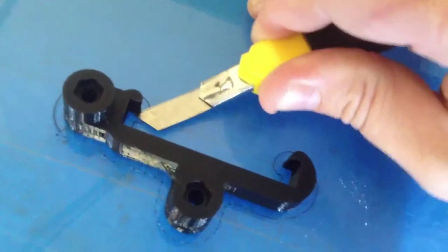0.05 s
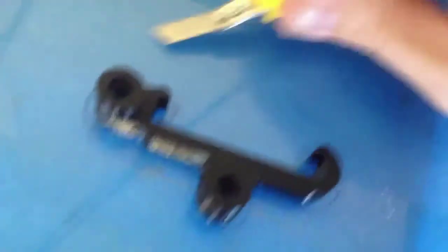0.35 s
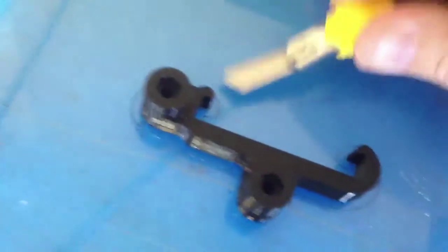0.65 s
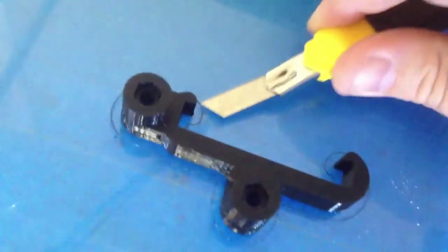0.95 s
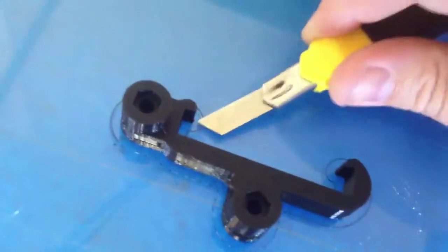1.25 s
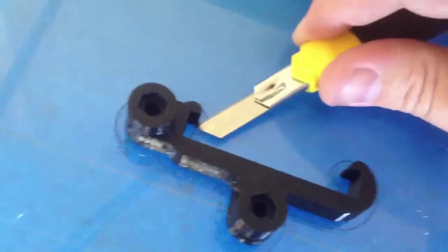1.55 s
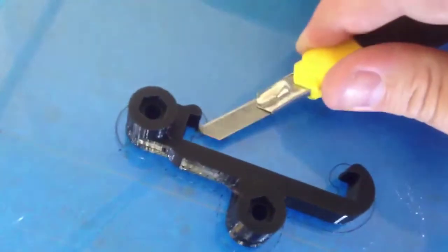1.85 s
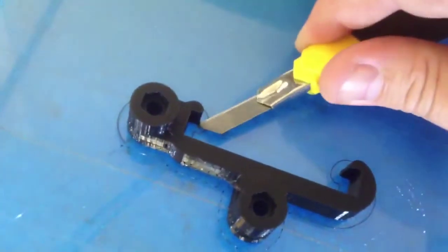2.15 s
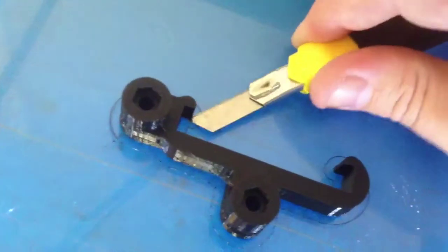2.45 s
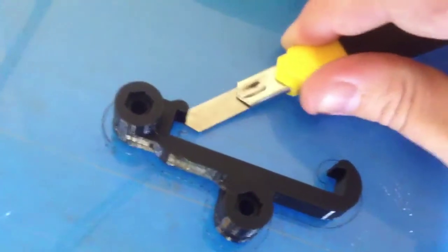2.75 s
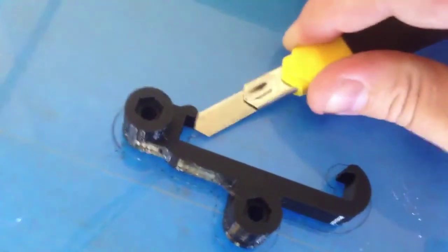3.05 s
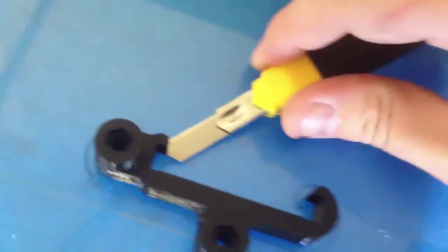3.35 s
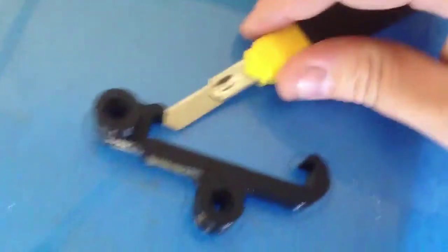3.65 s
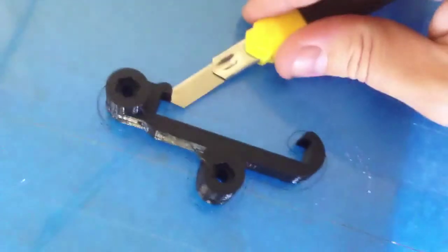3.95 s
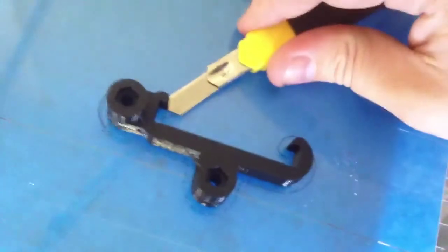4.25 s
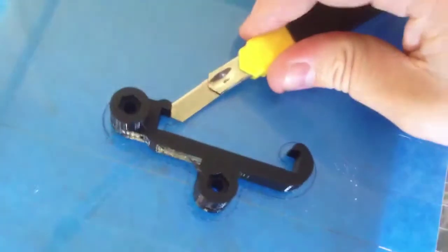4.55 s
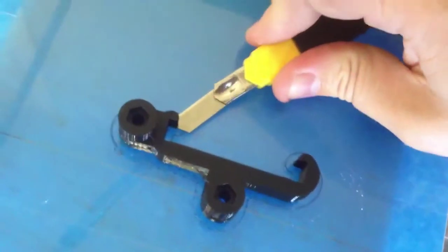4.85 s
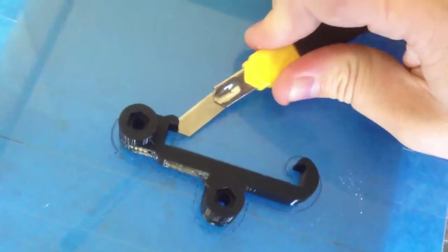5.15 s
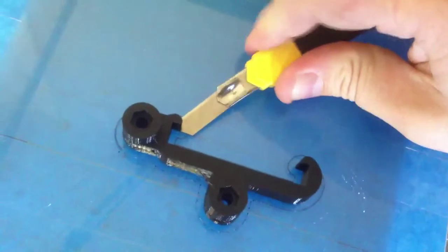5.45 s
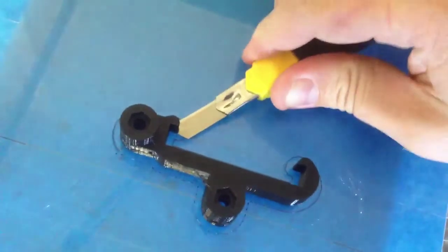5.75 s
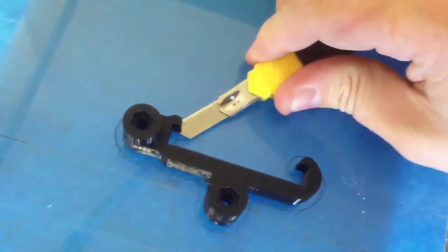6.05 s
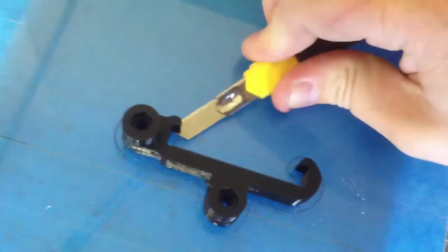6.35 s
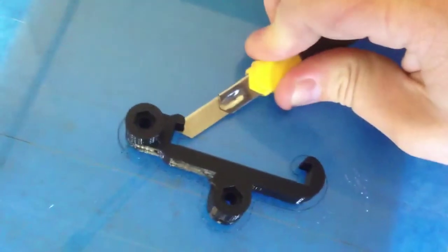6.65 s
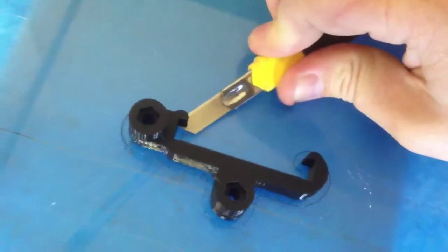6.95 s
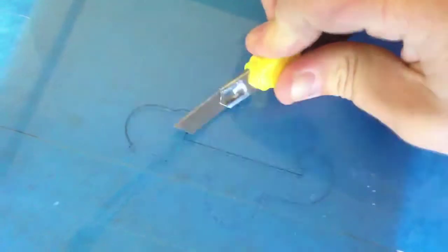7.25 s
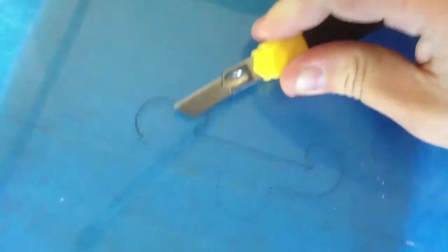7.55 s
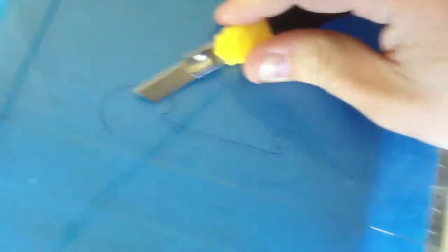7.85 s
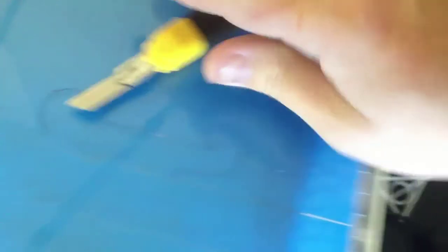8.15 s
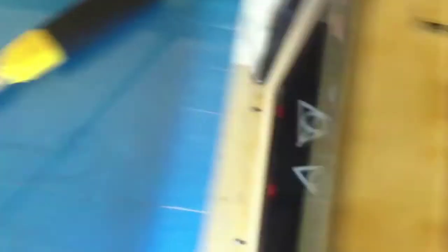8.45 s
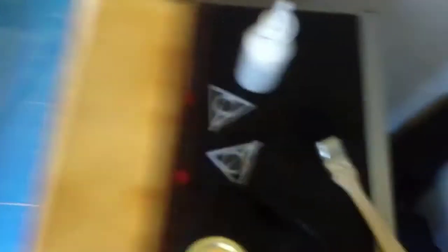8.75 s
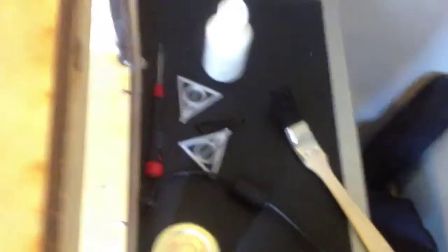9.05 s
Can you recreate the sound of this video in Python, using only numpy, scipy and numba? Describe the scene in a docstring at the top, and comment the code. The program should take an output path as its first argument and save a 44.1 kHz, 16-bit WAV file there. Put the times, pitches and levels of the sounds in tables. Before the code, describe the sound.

A 3D printer's fans hum steadily throughout, close by in a small room, with a faint high whine. Right at the start a craft knife blade slips on the glass bed with a quick cluster of sharp, ringing ticks, followed by faint short scrapes until about 1.3 seconds. More ticks and knocks come around 2.6 to 2.9 seconds, and a bright metallic click at 4.2. From 4.9 seconds the stuck plastic part gives small brittle cracks, which thicken into crackling near 6.8. At 7.1 it snaps free sharply. The part knocks on the frame at 7.4, then bounces with loud clacks and a hollow knock from 7.7, loudest near 7.9, tumbling to rest by 8.2. The hum dips briefly after these blows. The knife rustles softly in the hand until 8.5, and the hum and thin whine become plainer through the end, just after 9 seconds.

```python
"""A small room, close to the glass bed of a 3D printer, where a craft knife picks at a stuck plastic part.
The blade scrapes by stick-slip friction and strikes the glass; the bond cracks in brittle steps and
snaps; the part flies off, knocks on the frame and clatters to rest. Each impact is a burst of noise
plus the damped modes of the bodies it excites. The printer's fans hum throughout beside a thin whine,
and an automatic gain control ducks the whole sound after the loudest blows."""
import sys
import numpy as np
from scipy import signal
from scipy.fft import rfft, irfft, next_fast_len
from scipy.io import wavfile
from scipy.ndimage import uniform_filter1d
from numba import njit

SR = 44100
rng = np.random.default_rng(int(sys.argv[2]) if len(sys.argv) > 2 else 0)


def int16_out(signal):
    """Quantize to a 16-bit WAV file."""
    q = np.round(np.clip(np.atleast_2d(signal).T, -1, 1) * 32767)
    wavfile.write(sys.argv[1], SR, q.astype(np.int16))


N = 406148
TIME = np.arange(N) / SR
AGE = np.arange(SR // 2) / SR  # seconds since an impact
BLOW_SPAN_S = .003

# Reverberation of the room. Each row: frequency in Hz, t60 (time to fall 60 dB) in seconds.
ROOM_T60 = [(150, 3.45), (500, 0.82), (1500, 0.3846), (4000, 0.55), (8000, 0.47), (14000, 0.19)]
# Spectra of the room, the rushing air and the contact noises.
# Each row: frequency in Hz, relative level in dB.
ROOM_SPECTRUM = [(100, -5), (600, -1), (1500, 2), (5000, 0.5), (8000, -0.5), (10500, -2.5), (15000, -1.5)]
AIR_SPECTRUM = [(30, -15), (80, -29), (125, -9), (180, -3), (230, -10), (300, -1.5), (440, -0.5), (570, -6),
                (800, -6.5), (1600, -7), (3300, -15), (6300, -22.3), (10000, -42.5), (14000, -31)]
SCRAPE_SPECTRUM = [(200, -36), (1500, -6), (3500, -10), (5300, -4), (7500, -5.5), (10200, -16.5),
                   (13000, -14), (15500, -21.5)]
SPLIT_SPECTRUM = [(200, -27), (1500, -16.5), (3500, -16.5), (4500, -5.5), (6000, -6), (8000, -5.5),
                  (10500, -11), (13500, -17.5), (15500, -6.5)]
CLACK_SPECTRUM = [(60, -42), (150, -22), (350, -14), (800, -3.5), (1600, 2), (3000, -4.5), (4700, -7),
                  (7000, -11.5), (8500, -17.5), (10200, -30), (13000, -31), (15500, -40)]
TICK_SPECTRUM = [(100, -32.5), (600, -16.5), (2000, -3), (3100, -3.5), (4500, 2), (7500, -2.5),
                 (9000, -5.5), (10200, -15.5), (12500, -10), (15500, -7.5)]

# Harmonics of the slow fan. Each row: multiple of the shaft rate, base level in dB.
FAN_HARMONICS = [(3, -66), (4, -59), (5, -58.5), (6, -52.8), (7, -54.3), (8, -64.5), (9, -67.5),
                 (10, -69.5), (11, -68.5), (12, -64), (16, -67.5), (17, -68), (18, -63.5), (19, -59.5),
                 (21, -65), (26, -69), (34, -69.5), (38, -69), (41, -67), (46, -68.5)]
# Blade tones of the small fans. Each row: frequency in Hz, base level in dB, fractional pitch wander.
FAN_TONES = [(302.9, -48.8, .003), (396, -61, .006)]
# Resonances of the housing. Each row: frequency in Hz, bandwidth in Hz, base level in dB.
HOUSING_RESONANCES = [(1176, 110, -59.5), (1390, 120, -64.5), (1720, 120, -62), (2644, 160, -64.5),
                      (4390, 350, -68.5)]
# Nearness of the fans. Each row: time in seconds, gain on their base levels in dB.
FAN_NEARNESS = [(0, .3), (0.5, -1.8), (3, -.7), (7, -.6), (7.7, -.3), (8.4, 4.8), (9.2, 2.2)]
# Whine, plainer once the microphone turns from the bed. Each row: time in seconds, level in dB.
WHINE_LEVELS = [(0, -73), (4, -73), (8.4, -70), (8.7, -60.5), (9.2, -59.5)]

# Normal modes of each body. Each row: frequency in Hz, relative level in dB, t60 in seconds.
BLADE_MODES = [(2950, -11, 0.028), (3800, -9, .014), (4344, -8, 0.055), (4650, -6, 0.016), (5860, 3, .02),
               (6140, -3, .025), (6620, -4, .11), (6760, -1, .11), (7224, 5.5, 0.011), (7860, -2.5, .04),
               (13000, -11.5, .02)]
BED_MODES = [(416, -3, .05), (650, -1, .045), (1002, -4.5, 0.023), (1135, 6.5, 0.052), (1454, -3, .045),
             (1560, -7.5, .04), (1857, -1, 0.024), (2200, 0.5, 0.026)]
PART_MODES = [(2830, -11, 0.03), (4120, -1.5, 0.018), (4980, -8.5, 0.017), (7500, 1.5, 0.0085),
              (8510, 0.5, 0.0097), (12100, -15, 0.016), (12900, -2.5, 0.013)]
PART_FLEX_MODES = [(400, -9, .07), (1010, -2, .022), (1950, 0, .011), (2890, -4, .012), (3257, -6, .014)]
FRAME_MODES = [(768, -4, 0.075), (1306, 4, 0.05), (1296, -8, 0.048), (1480, -13, 0.028),
               (1820, -4.5, 0.061), (2460, -7, 0.03), (3260, -9.5, 0.023)]
PANEL_MODES = [(144.7, -17.5, 0.78), (303, -9, 0.076), (333, -6.5, 0.15), (403.2, 2, 0.19), (479, -4, 0.22),
               (616, -8, 0.059), (671, -8, 0.14), (790, -21, .1)]

# The knife rustles in the hand as it is lifted away. Each row: start in seconds, level in dB.
RUSTLES = [(8.179, -21.5), (8.241, -26), (8.321, -26), (8.372, -27.5), (8.443, -35), (8.485, -31)]
# Strokes of the tip along the glass. Each row: start in seconds, length in seconds, strength in dB.
STROKES = [(0.3674, .01, -36), (0.6882, .03, -25.5), (0.7854, .01, -34), (1.114, .01, -31.5),
           (1.1434, .095, -28.5), (1.285, .01, -37), (2.2009, .01, -46), (2.562, .026, -21.5)]
# Sharp cracks of the bond. Each row: start in seconds, strength in dB.
CRACKS = [(4.8937, -36), (4.9966, -27), (5.0439, -23), (5.1629, -19.5), (5.9174, -40), (6.1885, -33.5),
          (6.6659, -23.5), (6.772, -24.5), (6.8142, -25), (6.8535, -16.5), (6.8628, -15), (6.922, -25.5),
          (6.9368, -24), (7.063, -28), (7.0782, -25)]
# Spells of peeling. Each row: start in seconds, end in seconds, strength in dB.
PEELS = [(4.985, 5.12, -38), (6.755, 6.89, -30.5), (7.08, 7.108, -32)]
# How freely the part rings as it comes loose. Each row: time in seconds, gain of its ring in dB.
LOOSENESS = [(5, -31), (6.7, -13), (7.1, -7.5)]
# Bounces of the part. Each row: start in seconds, clack level in dB, tilt in dB per octave, surface.
BOUNCES = [(7.3775, -7.2, -1, "frame"), (7.4074, -11, -2.5, "frame"), (7.488, -25, -3.5, "frame"),
           (7.5174, -30, 12, "edge"), (7.726, -7, -7, "bench"), (7.7322, -13, -13.5, "panel"),
           (7.7651, -5.5, -2, "bench"), (7.844, -6, -5, "bench"), (7.9206, 2, 3.5, "edge"),
           (7.939, -13, 14, "edge")]
# What the part hits. Each entry: frame ring, hollow panel boom and room send, in dB relative to the clack.
SURFACES = {"frame": (-1.5, -16, -9.5), "panel": (-12, 14, -24), "bench": (-15, -18, .3),
            "edge": (-13, -13, -10)}
# The blade slips and strikes the glass. Each row: start in seconds, tick level in dB,
# knock strength in dB, knock pitch in Hz, blade ring level in dB, ring pitch in Hz.
SLIPS = [(0.135, -15.5, -18, 2100, -22, 3900), (0.1435, -10.5, -14.5, 1250, -9.5, 5950),
         (0.1515, -8, -16.5, 1400, -27.5, 6000), (0.9415, -36, -36, 1550, -36, 5800),
         (2.5874, -22.5, -36, 750, -31, 4200), (2.6963, -19, -15.5, 1280, -18, 4150),
         (2.9338, -30, -36, 1100, -24.5, 4280), (4.159, -24, -38, 1400, -33.5, 8070),
         (4.162, -11, -33, 3000, -15, 6850), (4.6726, -46, -35.5, 1430, -38.5, 4600),
         (5.273, -35, -36.5, 1300, -44, 6800), (6.4225, -48, -40.5, 1050, -50.5, 6030)]
# The bed's dense modes. Each row: multiple of the knock pitch, relative level in dB.
THUMP_SHAPE = [(.1, -34.5), (.4, -16), (.8, 0), (1.1, 2), (1.5, -2.5), (2.2, -17), (6, -39)]


def undb(db):
    """Amplitude ratio for a level in decibels."""
    return 10 ** (np.asarray(db) / 20)


def level(x, db):
    """Scale a steady sound to an rms level."""
    return x * undb(db) / np.sqrt(np.mean(x ** 2))


def blow(x, db):
    """Scale a transient by its energy, as if all of it fell within BLOW_SPAN_S."""
    return x * undb(db) / np.sqrt(np.sum(x ** 2) / (BLOW_SPAN_S * SR))


def fade(t60):
    """Exponential decay by 60 dB in t60 seconds."""
    return np.exp(-np.log(1000) * AGE / t60)


def on_log(hz, points):
    """Interpolate (Hz, value) points on a logarithmic frequency axis."""
    knots_hz, values = np.transpose(points)
    return np.interp(np.log(np.maximum(hz, 1)), np.log(knots_hz), values)


def colour(x, spectrum, tilt_db=0):
    """Minimum-phase filter with the given spectrum, tilted by tilt_db per octave above 500 Hz."""
    size = 2 * next_fast_len(len(x) // 2 + 1)
    hz = np.fft.rfftfreq(size, 1 / SR)
    octave = np.log2(np.maximum(hz, 500) / 1000)
    cepstrum = irfft(np.log(undb(on_log(hz, spectrum) + tilt_db * octave)))
    cepstrum[1:size // 2] *= 2  # folding the cepstrum makes the filter causal
    cepstrum[size // 2 + 1:] = 0
    return irfft(rfft(x, size) * np.exp(rfft(cepstrum)))[:len(x)]


def drift(rate_hz):
    """Slow random modulation of unit rms, gliding to a new value rate_hz times a second."""
    step = int(SR / rate_hz)
    held = np.repeat(rng.standard_normal(N // step + 1), step)
    return level(uniform_filter1d(held, step)[:N], 0)


def add(track, s, x):
    """Superpose x on the track from s seconds."""
    start = int(s * SR)
    track[start:start + len(x)] += x[:N - start]


def contact(spectrum, db, t60, tilt_db=0, rise_s=.0005):
    """Modal overlap: the dense, heavily damped vibrations of a contact merge into a burst of noise."""
    envelope = fade(t60) * (1 - np.exp(-AGE / rise_s))
    return blow(colour(rng.standard_normal(len(AGE)) * envelope, spectrum, tilt_db), db)


def radiated(spectrum, db, tilt_db=0):
    """Spatial averaging: summed over all directions, a contact sends a smooth spectrum into the room."""
    return blow(colour(signal.unit_impulse(len(AGE)), spectrum, tilt_db), db)


def ring(modes, db, scatter_db=2.0, detune=.0017, rise_cycles=.98):
    """Free vibration: damped modes whose strength, sign and pitch vary with where the blow lands."""
    out = 0
    for (hz, mode_db, t60), (size, side, shift) in zip(modes, rng.standard_normal((len(modes), 3))):
        cycles = hz * (1 + detune * shift) * AGE
        mode = np.sin(2 * np.pi * cycles) * (1 - np.exp(-cycles / rise_cycles)) * fade(t60)
        out = out + np.sign(side) * blow(mode, mode_db + scatter_db * size)
    return blow(out, db)


def favour(modes, pitch_hz, slope_db):
    """Selective excitation: the contact point favours modes near a pitch, by slope_db per octave."""
    return [(hz, db - slope_db * abs(np.log2(hz / pitch_hz)), t60) for hz, db, t60 in modes]


def room(x, build_s=.002):
    """Diffuse reverberation: half a second of dense reflections, dying sooner in the treble."""
    noise = rfft(rng.standard_normal(len(AGE)))
    hz = np.fft.rfftfreq(len(AGE), 1 / SR)
    centres, t60s = np.transpose(ROOM_T60)
    tail = 0
    for weights, t60 in zip(np.eye(len(centres)), t60s):
        band = on_log(hz, list(zip(centres, weights)))
        tail = tail + irfft(noise * band, len(AGE)) * fade(t60)
    tail *= 1 - np.exp(-(AGE / build_s) ** 2)
    response = colour(tail / np.sqrt(np.sum(tail ** 2)), ROOM_SPECTRUM)
    return signal.fftconvolve(x, response)[:N]


def fans(shaft_hz=65.25, shaft_wander=.0016, air_db=-50.6, flutter_db=1.4, tone_flutter_db=1.7):
    """Rotation gives wavering harmonics and blade tones; turbulence hisses and excites the housing."""
    shaft_angle = 2 * np.pi * np.cumsum(shaft_hz * (1 + shaft_wander * drift(4))) / SR
    out = level(colour(rng.standard_normal(N), AIR_SPECTRUM), air_db)
    for order, db in FAN_HARMONICS:
        harmonic = np.sin(order * shaft_angle + 2 * np.pi * rng.random())
        out += level(harmonic * undb(flutter_db * drift(14)), db)
    for hz, db, wander in FAN_TONES:
        phase = 2 * np.pi * np.cumsum(hz * (1 + wander * drift(15))) / SR
        out += level(np.sin(phase) * undb(tone_flutter_db * drift(14)), db)
    for hz, width_hz, db in HOUSING_RESONANCES:
        resonator = signal.iirpeak(hz, hz / width_hz, fs=SR)
        out += level(signal.lfilter(*resonator, rng.standard_normal(N)), db)
    return out * undb(np.interp(TIME, *np.transpose(FAN_NEARNESS)))


def whine(pitch_hz=4660, width_hz=110):
    """The printer's electrical whine: narrow-band noise is heard as an unsteady pitch."""
    band = signal.iirpeak(pitch_hz, pitch_hz / width_hz, fs=SR)
    whistle = signal.lfilter(*band, signal.lfilter(*band, rng.standard_normal(N)))
    return level(whistle, 0) * undb(np.interp(TIME, *np.transpose(WHINE_LEVELS)))


def catches(gap_s=.018, jitter_s=.002, scatter_db=1.5, ease_db=-4.5):
    """Stick-slip motion: a stroke breaks into uneven catches (s, dB) that weaken as pressure eases."""
    for start, length, db in STROKES:
        ages = np.arange(0, length, gap_s)
        for age, (late, size) in zip(ages, rng.standard_normal((len(ages), 2))):
            s = start + age + jitter_s * late * (age > 0)
            yield s, db + ease_db * age / length + scatter_db * size


def scraping(scrape_db=-11, squeak_db=-15, squeak_hz=5500, room_db=-8):
    """Friction: the knife rustles in the hand, and each catch of its tip scrapes and faintly squeaks."""
    direct = np.zeros(N)
    for s, db in RUSTLES:
        add(direct, s, contact(SCRAPE_SPECTRUM, db, t60=.065, tilt_db=-2.0))
    for s, db in catches():
        scrape = contact(SCRAPE_SPECTRUM, db + scrape_db, t60=.048)
        squeak = ring([(squeak_hz, 0, .04)], db + squeak_db, detune=.058)
        add(direct, s, scrape + squeak)
    return direct, direct * undb(room_db)


def fine_cracks(gap_s=.015, scatter_db=2.5):
    """Stepwise fracture: each spell of peeling scatters small cracks (s, dB) at uneven gaps."""
    for start, end, db in PEELS:
        for s in np.arange(start, end - gap_s / 2, gap_s):
            yield s + gap_s * rng.random(), db + scatter_db * rng.standard_normal()


def bond(split_db=-10, untilted_db=-18, brightening=.16, room_db=-9, ring_room_db=-13):
    """Brittle fracture: as the part loosens, each crack is brighter and rings it more strongly."""
    direct, to_room = np.zeros(N), np.zeros(N)
    for s, db in [*CRACKS, *fine_cracks()]:
        loose_db = np.interp(s, *np.transpose(LOOSENESS))
        tilt_db = brightening * (loose_db - untilted_db)
        split = contact(SPLIT_SPECTRUM, db + split_db, t60=.0207, tilt_db=tilt_db, rise_s=.0003)
        ping = ring(PART_MODES, db + loose_db, scatter_db=5, detune=.017)
        add(direct, s, split + ping)
        add(to_room, s, split * undb(room_db) + ping * undb(ring_room_db))
    return direct, to_room


def tumbles(start_s=7.9593, first_db=-3.5, tilt_db=1.4, turn_s=.0345, slowing=1.39, loss_db=-4.2):
    """Dissipation: the part tumbles to rest in four bounces, each turn slower and weaker."""
    s = start_s
    for turn in range(4):
        yield s, first_db + loss_db * turn, tilt_db, "bench"
        s += turn_s * slowing ** turn


def falling_part(clack_t60=.036, ring_room_db=-1):
    """Impact excitation: each bounce clacks and drives the modes of the frame and a hollow panel."""
    direct, to_room = np.zeros(N), np.zeros(N)
    for s, clack_db, tilt_db, surface in [*BOUNCES, *tumbles()]:
        frame_db, panel_db, room_db = SURFACES[surface]
        body = ring(FRAME_MODES, clack_db + frame_db) + ring(PANEL_MODES, clack_db + panel_db)
        clack = contact(CLACK_SPECTRUM, clack_db, clack_t60, tilt_db, rise_s=.00067)
        add(direct, s, clack + body)
        wash = radiated(CLACK_SPECTRUM, clack_db, tilt_db)
        add(to_room, s, (wash + body * undb(ring_room_db)) * undb(room_db))
    return direct, to_room


def snap(start_s=7.1085, crack_db=-5.5, tilt_db=5.5, room_db=-5.5, flex_room_db=-8, blade_room_db=-17):
    """Release of elastic energy: the last of the bond cracks, the part flexes, the blade springs back."""
    direct, to_room = np.zeros(N), np.zeros(N)
    flex = ring(PART_FLEX_MODES, db=-13.5)
    ping = ring(favour(BLADE_MODES, pitch_hz=7470, slope_db=33.5), db=-9)
    crack = contact(TICK_SPECTRUM, crack_db, t60=.015, tilt_db=tilt_db, rise_s=.0015)
    add(direct, start_s, crack + flex + ping)
    wash = radiated(TICK_SPECTRUM, crack_db, tilt_db) * undb(room_db)
    add(to_room, start_s, wash + flex * undb(flex_room_db) + ping * undb(blade_room_db))
    return direct, to_room


def knife(thump_db=-2, bed_db=-2, even_tilt_db=-1.0, glance_tilt=.21,
          room_db=-12.6, ring_room_db=-5, knock_room_db=1):
    """A collision excites both bodies: the slipping blade ticks and rings, and the glass bed knocks."""
    direct, to_room = np.zeros(N), np.zeros(N)
    for s, tick_db, knock_db, knock_hz, ring_db, ring_hz in SLIPS:
        # a glancing slip has more tick than knock and is brighter
        tilt_db = even_tilt_db + glance_tilt * (tick_db - knock_db)
        thump_spectrum = [(multiple * knock_hz, db) for multiple, db in THUMP_SHAPE]
        bed = ring(favour(BED_MODES, knock_hz, slope_db=16.5), knock_db + bed_db)
        ping = ring(favour(BLADE_MODES, ring_hz, slope_db=33.5), ring_db)
        tick = contact(TICK_SPECTRUM, tick_db, t60=.018, tilt_db=tilt_db, rise_s=.0003)
        thump = contact(thump_spectrum, knock_db + thump_db, t60=.04)
        add(direct, s, tick + thump + bed + ping)
        wash = radiated(TICK_SPECTRUM, tick_db, tilt_db)
        wash += radiated(thump_spectrum, knock_db + knock_room_db)
        add(to_room, s, (wash + (bed + ping) * undb(ring_room_db)) * undb(room_db))
    return direct, to_room


def scene():
    """Superposition: direct and reverberant sound of knife and part, over the printer's fans and whine."""
    printer = fans() + whine()
    direct, to_room = np.sum([knife(), snap(), falling_part(), bond(), scraping()], axis=0)
    return (direct + room(to_room) + printer)[None]


@njit
def hold_peaks(x, keep):
    """Peak detection: follow every rise at once and let go exponentially."""
    out, peak = np.empty(len(x)), 0.
    for i in range(len(x)):
        peak = max(x[i], peak * keep)
        out[i] = peak
    return out


def gain_control(x, threshold_db, slope, attack_s=.055, release_s=.9):
    """Dynamic compression: power above the threshold pulls the gain down, and it recovers slowly."""
    power = np.maximum(uniform_filter1d(x ** 2, size=SR // 40), 1e-12)
    excess_db = np.maximum(10 * np.log10(power) - threshold_db, 0)
    held_db = hold_peaks(excess_db, np.exp(-1 / (release_s * SR)))
    keep = np.exp(-1 / (attack_s * SR))
    smoothed_db = signal.lfilter([1 - keep], [1, -keep], held_db)
    return x * undb(-slope * smoothed_db)


def record(dry, low_cut_hz=104, top_hz=15400):
    """Limits of range and bandwidth: gain control, clipping at full scale, bass cut and steep top cut."""
    x = np.clip(gain_control(dry[0], threshold_db=-19.5, slope=1.11), -1, 1)
    x = signal.sosfilt(signal.butter(3, low_cut_hz, "highpass", fs=SR, output="sos"), x)
    return signal.sosfilt(signal.ellip(10, .2, 70, top_hz, fs=SR, output="sos"), x)[None]


dry = scene()
out = record(dry)
int16_out(out)
```